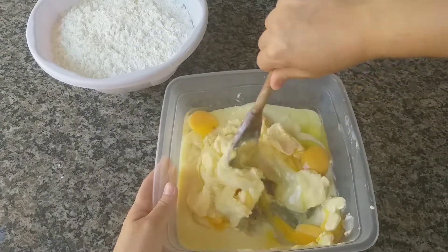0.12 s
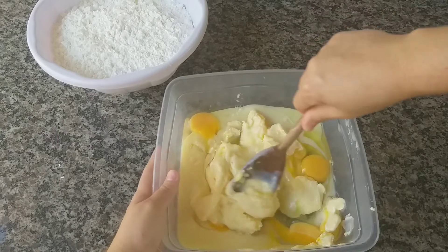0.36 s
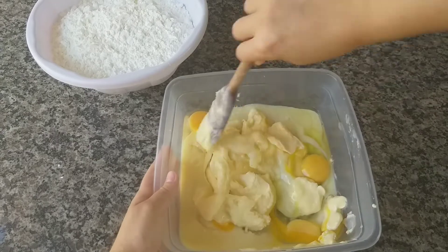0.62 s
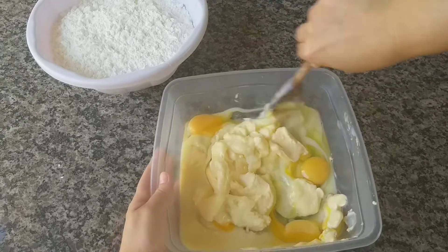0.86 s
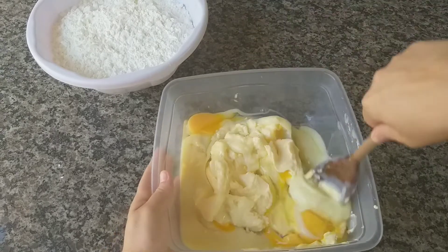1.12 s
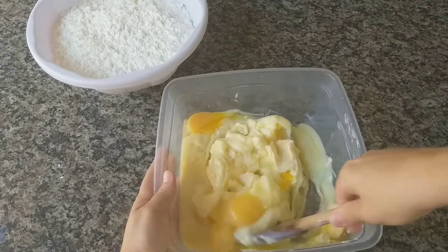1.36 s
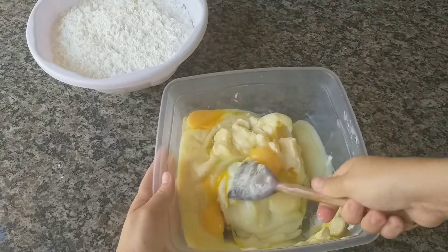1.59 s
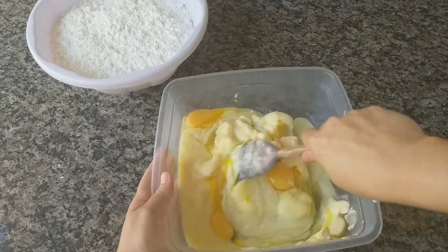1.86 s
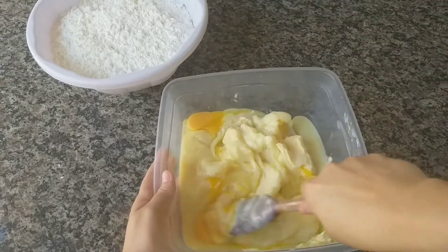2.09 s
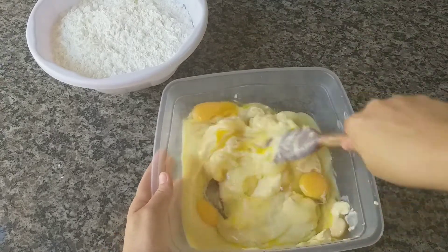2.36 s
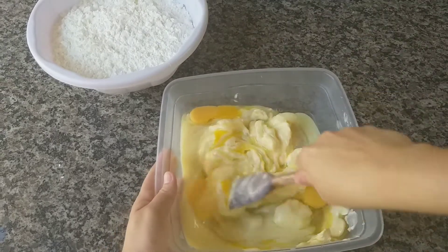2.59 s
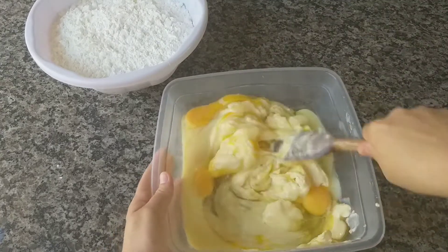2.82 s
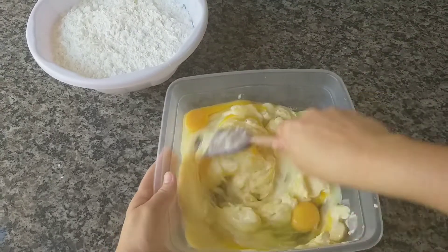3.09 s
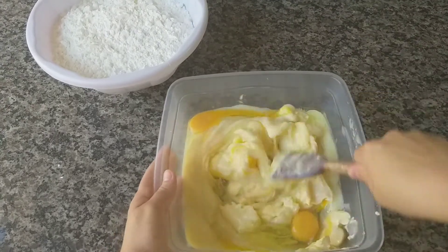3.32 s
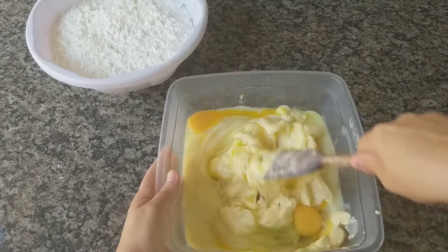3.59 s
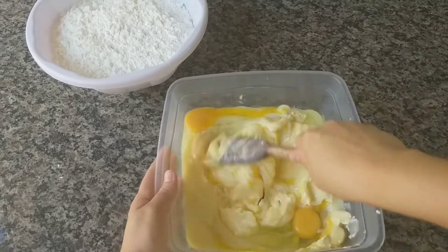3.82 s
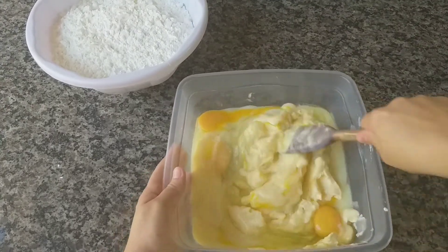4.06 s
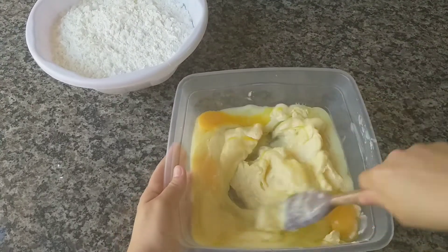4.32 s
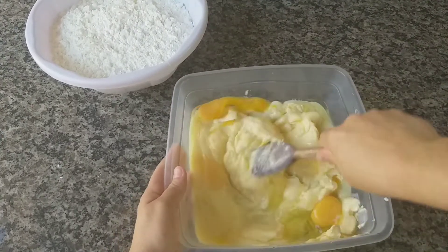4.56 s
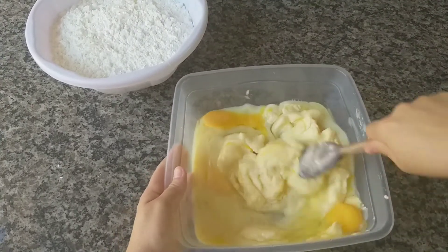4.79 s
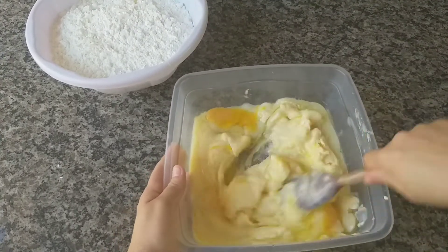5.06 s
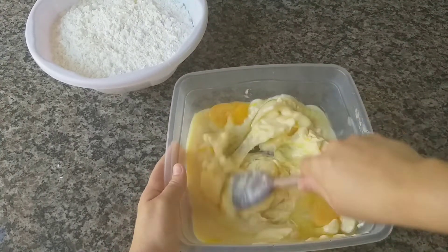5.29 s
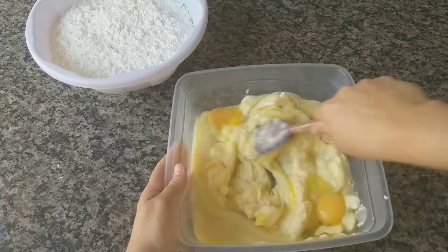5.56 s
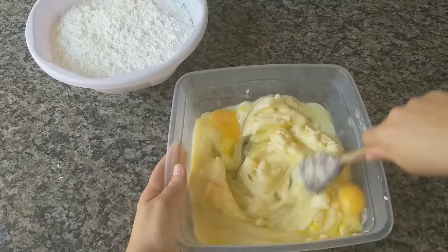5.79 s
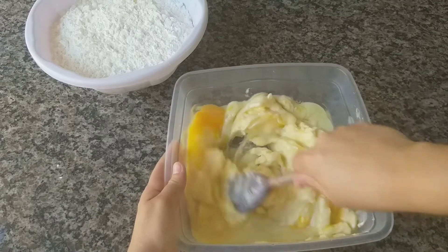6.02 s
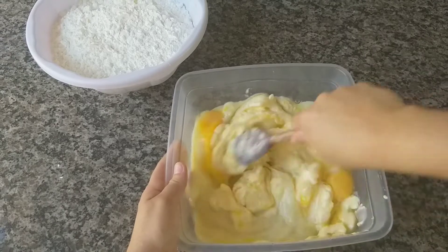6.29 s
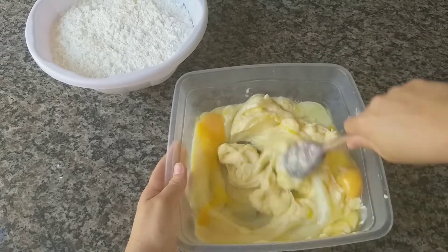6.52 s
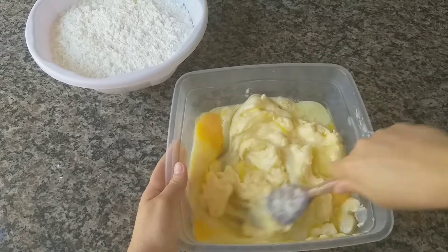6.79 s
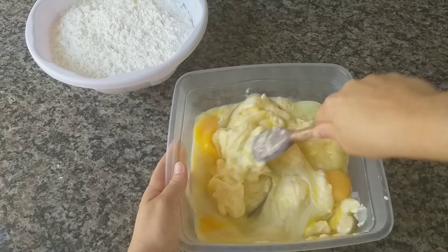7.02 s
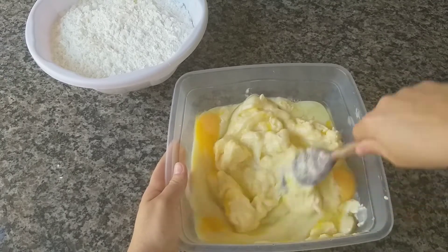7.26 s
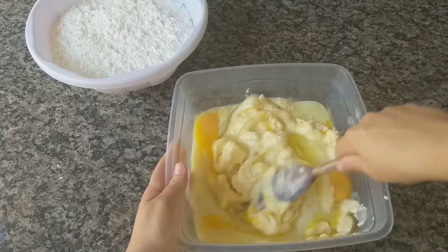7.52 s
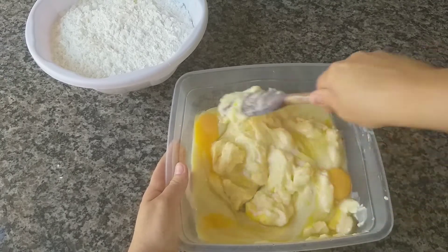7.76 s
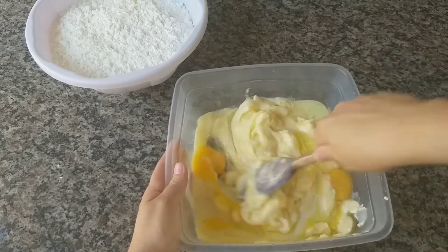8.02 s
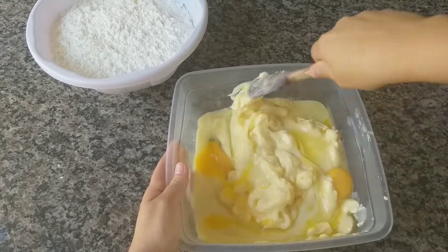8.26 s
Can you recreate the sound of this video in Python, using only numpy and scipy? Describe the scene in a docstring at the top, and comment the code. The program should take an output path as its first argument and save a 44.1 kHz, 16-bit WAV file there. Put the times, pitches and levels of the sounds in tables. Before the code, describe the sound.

A wooden spoon works through thick, eggy batter in a plastic tub on a stone counter. It starts sparsely with soft scrapes, then wet smacks and a hollow knock near one second. Strokes become steadier and denser, with hissy rasps, sticky ticks and short plastic thuds, before thinning at the end. Close microphone, quiet small kitchen, faint low hum early on.

```python
"""Stirring thick batter in a plastic tub

A wooden spoon stirs thick wet batter in a plastic tub on a stone counter, close to a phone with two microphone ports.
Each stroke scrapes grittily over the tub, hiss, rasp and drumming rising and slipping together.
Blows of the spoon ring the modes of the tub, collapsing cavities smack, and a wet edge whistles faintly.
Behind lies a quiet kitchen of shaped noise; a deep hum wavers in pitch, sinks and dies away before the end."""
import sys
import numpy as np
from scipy import signal
from scipy.fft import rfft, irfft, next_fast_len
from scipy.io import wavfile
from scipy.ndimage import uniform_filter1d

SR = 44100
rng = np.random.default_rng(int(sys.argv[2]) if len(sys.argv) > 2 else 0)


def transcribe(signal):
    """Save signal, clipped to [-1, 1], as a 16-bit WAV file at the path in sys.argv[1]."""
    frames = np.atleast_2d(signal).T
    limited = np.clip(frames, -1, 1)
    pcm = np.round(limited * 32767).astype(np.int16)
    wavfile.write(sys.argv[1], SR, pcm)


def volts_from_decibels(level):
    """Turn decibel levels (scalar or array-like) into linear amplitude factors."""
    exponent = np.asarray(level, float) / 20
    return 10 ** exponent


N = 369558
TIME = np.arange(N) / SR

# spectrum of the kitchen air: pitch_hz, relative level_db
KITCHEN_SPECTRUM = [(32, -9.5), (48, -6.5), (90, -3.5), (125, -0.5), (210, -13), (420, -15), (800, -16),
                    (2600, -25), (4500, -47), (8000, -37), (11000, -20), (15800, -29)]
# path of the deep hum: time_s, pitch_hz, level_db
HUM_PATH = [(0, 62.8, -74), (0.432, 61.2, -66.5), (.65, 45.8, -70.5), (0.991, 61.2, -67), (4.3, 46, -70.5),
            (4.55, 46.2, -101)]
# wet edge whistling on plastic: centre_s, level_db, length_s, pitch_hz
WHISTLES = [(0.373, -60, 0.15, 5200), (0.457, -54.5, 0.014, 4200), (1.787, -67.5, 0.059, 4300),
            (8.222, -67.5, 0.087, 4250)]
# batter tearing off spoon and wall: start_s, level_db, cavity_hz, length_ms
BATTER_SMACKS = [(0.199, -40.5, 2820, 11.4), (0.4176, -37.5, 5660, 5.8), (0.8796, -31.5, 1590, 8.8),
                 (0.907, -36, 1600, 7.5), (0.928, -12.5, 3760, 6.2), (0.9492, -24, 1420, 7.7),
                 (1.0342, -31, 8800, 5.6), (1.0876, -22.5, 3570, 5.2), (1.248, -25.5, 2600, 12),
                 (1.276, -26.5, 4670, 5.4), (1.3923, -27, 9100, 7.7), (1.4115, -23, 3460, 3.5),
                 (2.0936, -22, 3330, 4.9), (2.105, -22, 4100, 2.5), (2.391, -38, 7750, 2.7),
                 (2.4553, -23, 3920, 11.6), (2.789, -30, 4440, 4.5), (2.9012, -26.5, 3040, 3.7),
                 (2.946, -25, 9900, 8.1), (2.983, -32.5, 3270, 17), (3.267, -26.5, 5400, 3.2),
                 (4.0756, -24, 4900, 7.5), (4.094, -11, 2820, 1.2), (4.22, -28.5, 3350, 5.7),
                 (4.289, -34.5, 1840, 6.3), (4.3874, -38, 1870, 2.4), (4.633, -35.5, 5700, 5.6),
                 (4.936, -26.5, 10400, 3), (5.075, -29, 4020, 3.7), (5.436, -26, 3680, 5.3),
                 (5.4851, -22, 8150, 1.7), (5.607, -27.5, 3700, 11), (5.7712, -29, 3900, 9.9),
                 (5.951, -26, 5950, 6), (5.9862, -18.5, 3970, 3.1), (6.0598, -34.5, 3370, 4),
                 (6.2218, -26, 6810, 3.2), (6.2952, -23, 3310, 4.3), (6.301, -20.5, 5360, 3),
                 (6.354, -28, 3400, 2.9), (6.33, -16.5, 4100, 4.8), (6.41, -33, 10100, 4),
                 (6.4623, -21, 9500, 9.6), (6.466, -31, 3100, 6.6), (6.583, -34.5, 9300, 5.5),
                 (6.6539, -22, 3780, 2.66), (6.7614, -25.5, 1240, 9.9), (6.7938, -23, 2640, 2.3),
                 (6.837, -29.5, 9600, 4.9), (7.09, -38, 10700, 1.4), (7.129, -29.5, 10700, 6.4),
                 (7.16, -30, 3960, 2.8), (7.171, -28.5, 2970, 16), (7.41, -47.5, 2820, 3.8),
                 (7.439, -46, 10300, 3.5), (7.4577, -38, 11300, 4.8), (7.5054, -31, 9340, 4.2),
                 (7.619, -42, 10400, 3.3), (7.8402, -37, 7500, 6.5), (7.854, -40, 4430, 4),
                 (7.871, -46, 2460, 5)]
# spoon against the tub: start_s, peak_db, pitch region of the struck spot_hz, skid after the blow_s
SPOON_KNOCKS = [(0.55, -57.5, 740, 1), (0.7441, -33.5, 523, 0.18), (0.927, -29, 1600, 0.074),
                (0.951, -35.5, 620, 0.24), (2.454, -40.5, 706, 0.73), (2.458, -47.5, 173, 0.26),
                (4.089, -30.5, 1337, 0.17), (4.391, -42.5, 1250, 0.31), (5.438, -39, 485, 0.28),
                (5.773, -47, 499, 0.52), (6.147, -34, 592, 0.31), (6.466, -37, 757, 0.27),
                (6.532, -30, 892, 0.19), (6.764, -38, 1250, 0.22), (7.132, -38, 483, 0.28)]
# modes of the tub, lowest first: pitch_hz, relative level_db, undamped t60_s
TUB_MODES = [(137, 0, 0.28), (176, -6.5, 0.39), (389, -16.5, 0.21), (460.6, -7, 0.19), (562.6, -2.5, 0.058),
             (716, 9, 0.016), (880, -1.5, 0.087), (1250, -2, 0.047), (1600, 3, 0.07)]
# spectrum of the hiss at the edge: pitch_hz, relative level_db
HISS_SPECTRUM = [(1180, -45), (2000, -11), (2360, -14), (3220, -0.5), (3730, -3), (5550, -1.5), (7510, -5),
                 (9730, -4.5), (11300, 2), (12600, -3), (15800, -8.5)]
# drags of the spoon: edge bites start_s, swell_s, fade_s, peak hiss_db of the edge, peak rasp_db through the tub
DRAGS = [(0.0, 0.00057, 0.22, -46.5, -49.5), (0.286, 0.079, 0.23, -53.5, -61), (0.744, 0.11, 1, -53, -61),
         (1.062, 0.22, 0.13, -41, -41), (1.36, 0.028, 0.3, -50.5, -48.5), (1.851, 0.091, 0.24, -47, -64),
         (2.06, 0.024, 0.31, -46, -49.5), (2.2, 0.11, 0.29, -48.5, -54.5), (2.445, 0.066, 0.26, -40.5, -45),
         (2.721, 0.069, 0.23, -44, -59), (2.86, 0.096, 0.22, -46.5, -49), (3.228, 0.048, 0.29, -49.5, -59),
         (3.365, 0.035, 0.099, -46, -52), (3.896, 0.1, 0.25, -48, -64), (4.061, 0.032, 0.18, -40.5, -39.5),
         (4.24, 0.066, 0.32, -50.5, -57), (4.388, 0.066, 0.14, -40, -44.5), (4.6, 0.14, .3, -54, -78),
         (4.777, 0.041, 0.18, -33, -40.5), (4.98, 0.029, 0.22, -54.5, -69),
         (5.07, 0.11, 0.25, -39.5, -44.5), (5.43, 0.17, 0.17, -39.5, -46.5),
         (5.775, 0.16, 0.16, -40, -39.5), (6.164, 0.16, 0.11, -42, -44.5),
         (6.464, 0.0029, 0.28, -47.5, -54), (6.6, 0.064, 0.18, -42.5, -48),
         (6.737, 0.042, 0.14, -42.5, -38), (7.131, 0.071, 0.079, -44, -52.5), (7.5, 0.041, 0.087, -52, -67),
         (7.905, 0.063, 0.093, -43, -58), (8.329, 0.098, 0.11, -53, -80)]
# bands that lean to one microphone port: low_hz, high_hz, level_db, way (left positive, right negative)
PORT_BANDS = [(1600, 2280, -10, 0.89), (9000, 10730, -9.5, -0.78)]

TOP_HZ = 15900  # upper limit of the microphones and of the broad part of the smacks
KITCHEN_DB = -69  # rms
REST_DB = -76  # the batter never lies quite still
BITE_DB, SWELL_CURVE = -10.5, 0.98  # level under the peak as the edge bites; curve over 1 = rounded peak
LEAD_DB, BITE_S = -12, 0.029  # ahead of the bite the level falls away by this much in this time
FADE_DB, FADE_CURVE = -25, 1.13  # reached at the end of the fade; over 1 = lingers, then drops
RASP_SWELL = 1.31  # the rasp swells wider in dB than the hiss
SETTLE_DB, SETTLE_T60_S = -34.5, 0.3  # batter sliding back after a drag
# rasp set off by a knock: level under the knock at JOLT_HZ, more on stiff, high-pitched spots
JOLT_DB, JOLT_DB_PER_OCT, JOLT_HZ, JOLT_T60_S = -9.5, 8, 1250, 0.25


def unit(x):
    """Scale to rms 1."""
    return x / np.sqrt(np.mean(x ** 2))


def colour(x, points):
    """Shape the spectrum by (Hz, dB) points, joined on a log frequency axis."""
    hz, db = np.transpose(points)
    size = next_fast_len(N)
    f = np.arange(1, size // 2 + 2) * SR / size
    gain = volts_from_decibels(np.interp(np.log(f), np.log(hz), db))
    return irfft(rfft(x, size) * gain, size)[..., :N]


def band(x, lo_hz, hi_hz):
    """Causal band-pass."""
    return signal.sosfilt(signal.butter(2, [lo_hz, hi_hz], "band", fs=SR, output="sos"), x)


def walk(rate):
    """Random levels held 1 / rate s and slewed twice; spread near 1."""
    k = int(SR / rate)
    levels = np.repeat(rng.standard_normal(N // k + 1), k)
    return 1.145 * uniform_filter1d(uniform_filter1d(levels, k), k)[:N]


def grit(spread, smear_ms):
    """Dense slips of very unequal size, each smeared into a short puff of noise."""
    sizes = 10 ** (spread * np.minimum(rng.exponential(size=N), 7.5) / 20)
    slips = sizes * (rng.random(N) < .05)
    fade = np.exp(-1000 / (smear_ms * SR))
    power = signal.lfilter([1], [1, -fade], slips ** 2) + 1
    return unit(np.sqrt(power) * rng.standard_normal(N))


def tub(force, damping, spot_db=0, stretch=1):
    """The walls ring in their modes; the spot that is hit weights them, clinging batter detunes them."""
    out = 0
    gains = volts_from_decibels(spot_db + np.zeros(len(TUB_MODES)))
    stretches = stretch + np.zeros(len(TUB_MODES))
    for (hz, db, t60_s), gain, shift in zip(TUB_MODES, gains, stretches):
        r = np.exp(-damping * np.log(1000) / (t60_s * SR))  # damping over 1 shortens the ring
        w = 2 * np.pi * hz * shift / SR
        mode = np.sin(w) * signal.lfilter([1], [1, -2 * r * np.cos(w), r * r], force)
        out = out + gain * volts_from_decibels(db) * mode
    return out


def room(x):
    """Hard kitchen walls answer with a short tail."""
    wet_db, t60_s = -11, 0.19
    t = np.arange(SR // 3) / SR
    tail = rng.standard_normal(len(t)) * np.exp(-np.log(1000) * t / t60_s) * (t > .002)
    return x + volts_from_decibels(wet_db) * signal.fftconvolve(x, tail / np.linalg.norm(tail))[:N]


def kitchen():
    """Quiet background of shaped noise; its bass swells and wavers."""
    air = colour(rng.standard_normal(N), KITCHEN_SPECTRUM)
    bass = band(air, 22, 370)
    return unit(air + bass * (volts_from_decibels(walk(3.8)) - 1)) * volts_from_decibels(KITCHEN_DB)


def hum():
    """A deep tone with a rumble around it dips and returns in pitch, then sinks and dies away."""
    s, hz, db = np.transpose(HUM_PATH)
    phase = 2 * np.pi * np.cumsum(np.interp(TIME, s, hz)) / SR
    tone = np.sqrt(2) * volts_from_decibels(walk(7.1)) * np.sin(phase)
    rumble = volts_from_decibels(-13.0) * unit(band(rng.standard_normal(N), 50, 200))
    return (tone + rumble) * volts_from_decibels(np.interp(TIME, s, db))


def squeaks():
    """Narrow, unsteady whistles: noise in a slim band, swelling and fading."""
    air = rng.standard_normal(N)
    out = np.zeros(N)
    for s, db, length_s, hz in WHISTLES:
        swell = np.exp(-((TIME - s) / length_s) ** 2 * 2)
        out += unit(band(air, hz / 1.064, hz * 1.07)) * volts_from_decibels(db) * swell
    return out


def smacks():
    """A collapsing cavity: a ring of a few cycles inside a burst of wet crackle that swells and fades."""
    out = np.zeros(N + SR)
    t = np.arange(SR // 20) / SR
    crackles = rng.standard_normal((len(BATTER_SMACKS), len(t)))
    all_folds = rng.standard_normal((len(BATTER_SMACKS), SR // 200))
    for (s, db, hz, ms), crackle, folds in zip(BATTER_SMACKS, crackles, all_folds):
        length_ms = max(ms, .3)
        age = 3 * t * 1000 / length_ms
        fade = (age * np.exp(1 - age)) ** 1.12  # swell, then a slower fade
        since = np.maximum(t - length_ms / 3000, 0)  # the cavity snaps at the height of the swell
        ring = np.sin(2 * np.pi * hz * since) * np.exp(-since * hz / 4)
        near = unit(band(crackle, hz / 1.11, min(hz * 1.17, 18000)))
        broad = band(crackle, hz / 3, min(hz * 3, TOP_HZ))
        # folds of batter colour each one unevenly
        fold_response = folds * np.exp(-t[:len(folds)] / 0.00056)
        broad = unit(np.convolve(broad, fold_response)[:len(t)])
        i = int(s * SR)
        out[i:i + len(t)] += volts_from_decibels(db) * (0.35 * ring + 0.22 * near * fade + 0.2 * broad * fade)
    return out[:N]


def knocks():
    """A short rounded push rings the tub modes near the struck spot, then the spoon skids on for a moment."""
    out = np.zeros(N + SR)
    t = np.arange(SR // 3) / SR
    push = np.sin(np.pi * np.clip(t / 0.00021, 0, 1))
    modes = np.array(TUB_MODES)[:, 0]
    skids = rng.standard_normal((len(SPOON_KNOCKS), len(t)))
    for (s, db, hz, skid_s), skid in zip(SPOON_KNOCKS, skids):
        force = push + 0.28 * skid * np.exp(-np.log(1000) * t / max(skid_s, .005))
        nearest = modes[np.argmin(np.abs(np.log(modes / hz)))]
        # the wall modes slide with the load of batter; the two lowest belong to the floor of the tub and stay
        stretch = np.where(np.arange(len(modes)) < 2, 1, np.clip(hz / nearest, .9, 1.1))
        spot_db = -13 * np.abs(np.log2(modes / hz))
        ring = tub(force, 1.45, spot_db, stretch)
        ring = band(band(ring, hz / 2.5, 4200), hz / 2.5, 4200)
        i = int(s * SR)
        out[i:i + len(t)] += volts_from_decibels(db) * ring / np.abs(ring).max()
    return out[:N]


def pressure(peaks_db, swell=1):
    """Gain of all drags together: bite, swell to the peak, fade, and a faint settling tail."""
    power = volts_from_decibels(REST_DB) ** 2
    for (s, swell_s, fade_s, *_), peak_db in zip(DRAGS, peaks_db):
        before = np.clip(1 - (TIME - s) / swell_s, 0, 1)
        after = np.maximum(TIME - s - swell_s, 0)
        up_db = BITE_DB * before ** SWELL_CURVE + LEAD_DB * np.maximum(s - TIME, 0) / BITE_S
        fade = volts_from_decibels(FADE_DB * (after / fade_s) ** FADE_CURVE)
        settle = volts_from_decibels(SETTLE_DB - 60 * after / SETTLE_T60_S)
        power = power + (volts_from_decibels(peak_db + swell * up_db) * (fade + settle)) ** 2
    return np.sqrt(uniform_filter1d(power, SR // 40))  # the hand eases through the peak


def jolts():
    """Gain of the rasp that follows each knock, stronger for stiff, high-pitched spots."""
    out = np.zeros(N)
    for s, db, hz, _ in SPOON_KNOCKS:
        start_db = db + JOLT_DB + JOLT_DB_PER_OCT * np.log2(hz / JOLT_HZ)
        out += (TIME > s) * volts_from_decibels(start_db - 60 * np.abs(TIME - s) / JOLT_T60_S)
    return out


def pops(count):
    """Tiny air pockets bursting at random: a few cycles each, of very unequal size."""
    out = np.zeros(N + SR)
    t = np.arange(SR // 100) / SR
    for when, pitch, size in rng.random((count, 3)):
        hz = 2700 * 2 ** (2.2 * pitch)
        i = int(when * N)
        ring = np.sin(2 * np.pi * hz * t) * np.exp(-t * hz / 4) * np.minimum(t * hz / 2, 1)
        out[i:i + len(t)] += (size + .004) ** -.5 * ring
    return unit(out[:N])


def clumps(count):
    """Sticky lumps letting go at random: a wet tick that rings on unsteadily in its own small cavity."""
    out = np.zeros(N + SR)
    t = np.arange(SR // 20) / SR
    draws = rng.random((count, 4))
    for (when, pitch, size, hold), wet in zip(draws, rng.standard_normal((count, len(t)))):
        hz = 1400 * 2 ** (3.1 * pitch)
        i = int(when * N)
        burst = wet * np.sqrt(t) * np.exp(-t / (0.00048 + 0.0076 * hold ** 2))
        out[i:i + len(t)] += (size + 0.022) ** -.55 * band(burst, hz / 1.14, hz * 1.124)
    return unit(out[:N])


def scrape():
    """Gritty friction, each part with its own grit, all slipping together: hiss, rasp and drumming of the tub."""
    *_, hiss_db, rasp_db = np.transpose(DRAGS)
    edge = pressure(hiss_db)
    wall = np.hypot(pressure(rasp_db, RASP_SWELL), jolts())
    slip_db = 1.73 * walk(55)
    hiss = 0
    for lo_hz in 1500 * 2 ** np.arange(0, 3.4, .1):  # bands a tenth of an octave wide
        # patches of wet film change the colour from moment to moment
        film_db = 3.66 * walk(25) + 1.54 * walk(4.5)
        strip = unit(band(grit(2.44, 0.79), lo_hz, lo_hz * 2 ** (1 / 10)))
        hiss = hiss + volts_from_decibels(film_db) * strip * np.sqrt(lo_hz)
    hiss = unit(colour(hiss, HISS_SPECTRUM))
    hiss = hiss + volts_from_decibels(-10.0) * pops(count=2500) + volts_from_decibels(-11.5) * clumps(count=900)
    hiss = hiss * edge * volts_from_decibels(slip_db)
    rasp = unit(band(grit(0.94, 0.93), 970, 3930))
    rasp = rasp * wall * volts_from_decibels(-5.0 + slip_db + 2 * walk(60))
    drum = unit(band(tub(grit(1.57, 5.1), 1.06), 198, 2280))
    drum = drum * wall * volts_from_decibels(-15.5 + 2 * slip_db + 2 * walk(11))
    return hiss + rasp + drum


def scene():
    """Everything in front of the phone, alike at both ports; the room answers only the short sounds."""
    short_sounds = room(knocks() + smacks() + squeaks())
    return np.tile(kitchen() + hum() + short_sounds + scrape(), (2, 1))


def band_limit(x):
    """A steep low-pass at the top of the band."""
    return signal.sosfilt(signal.butter(12, 16500, fs=SR, output="sos"), x)


def record(dry):
    """Two close microphone ports hear nearly the same; they differ in narrow bands, in a faint hiss
    of opposite sign, and in a very faint copy of the sound, 1 ms late and of opposite sign."""
    mid = dry.mean(axis=0)
    side = 0
    for lo_hz, hi_hz, db, way in PORT_BANDS:
        side = side + way * volts_from_decibels(db) * band(band(mid, lo_hz, hi_hz), lo_hz, hi_hz)
    hiss = volts_from_decibels(-85.0) * rng.standard_normal(N)
    late_copy = volts_from_decibels(-37.5) * np.roll(mid, SR // 1000)  # 1 ms late
    side = side + hiss + late_copy
    ports = dry + np.array([[1], [-1]]) * side
    low_pass = signal.ellip(10, .2, 60, TOP_HZ, fs=SR, output="sos")
    return band_limit(signal.sosfilt(low_pass, ports))


dry = scene()
out = record(dry)
transcribe(out)
```